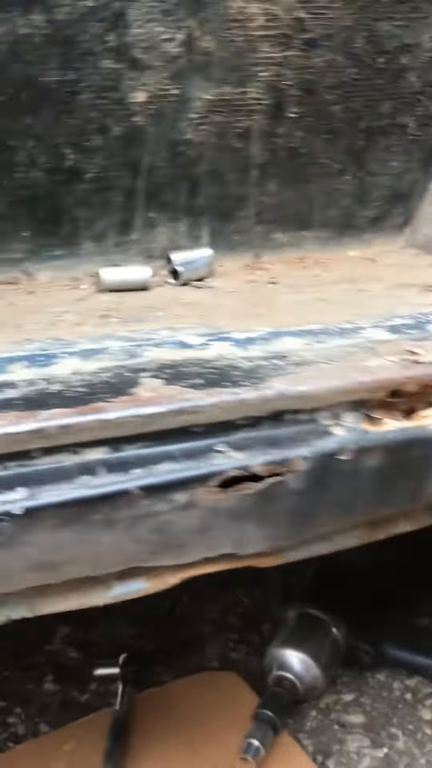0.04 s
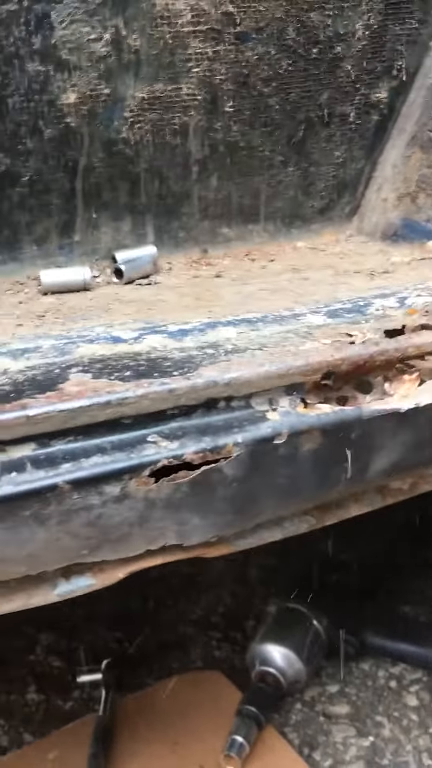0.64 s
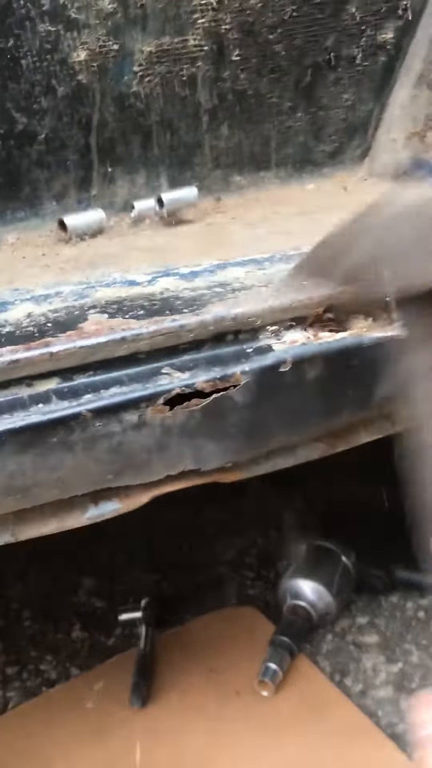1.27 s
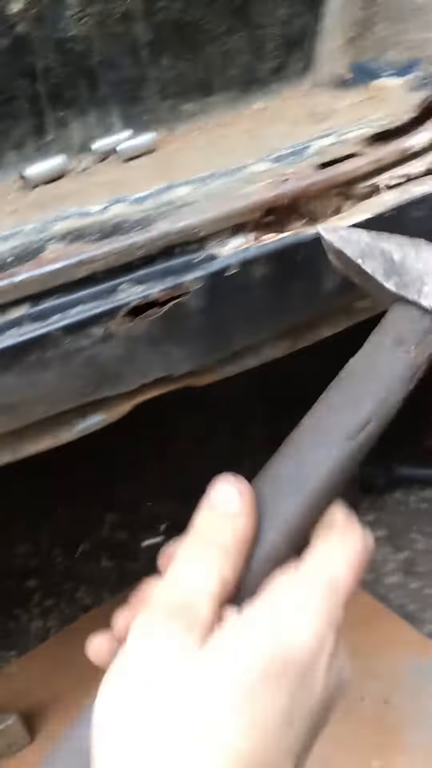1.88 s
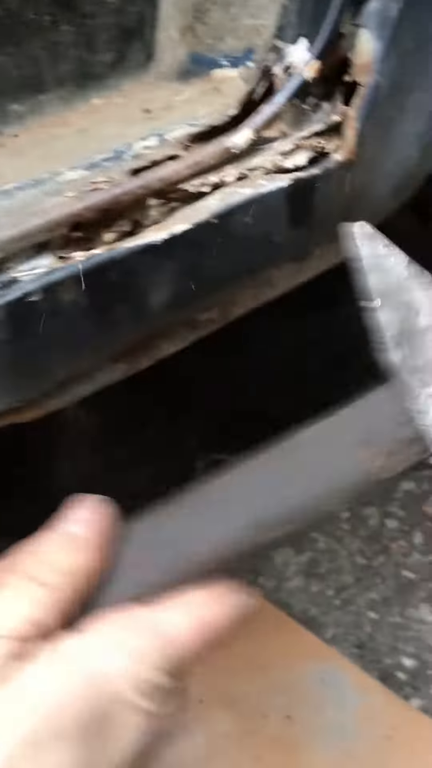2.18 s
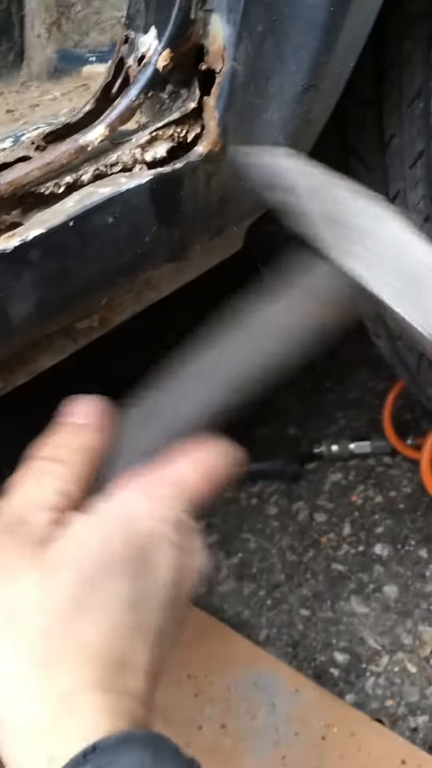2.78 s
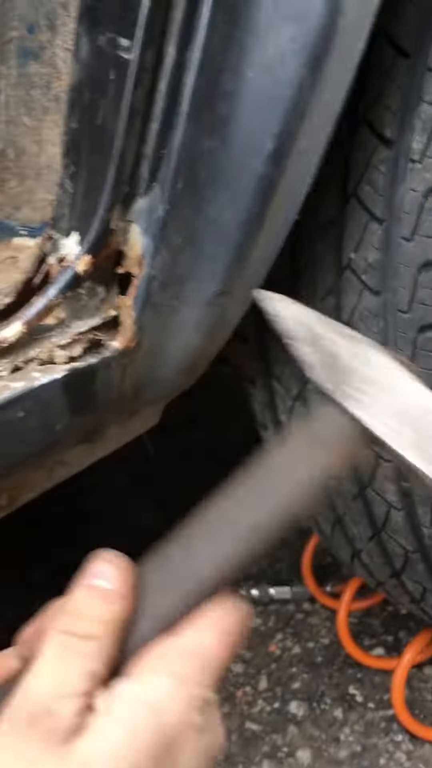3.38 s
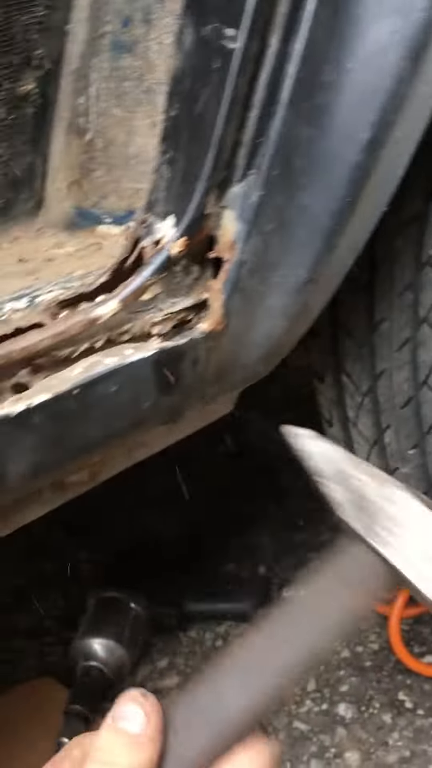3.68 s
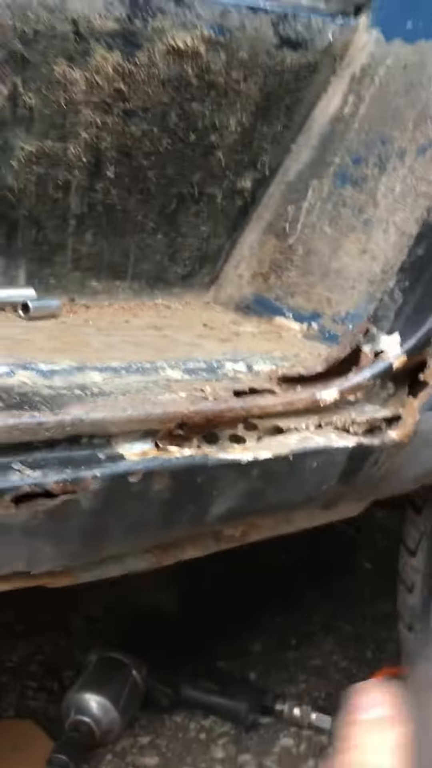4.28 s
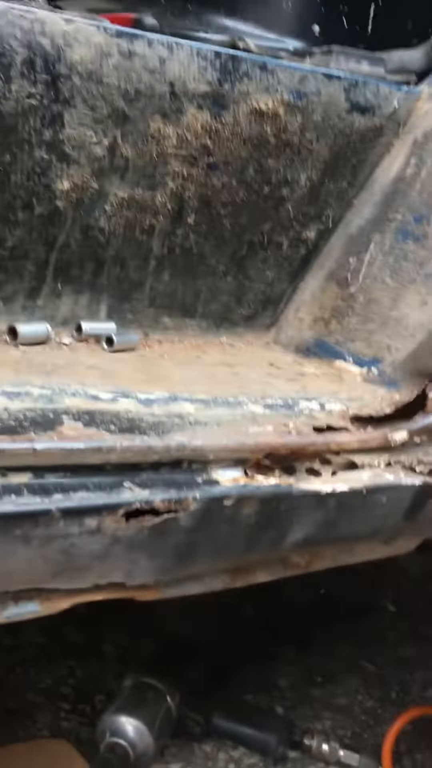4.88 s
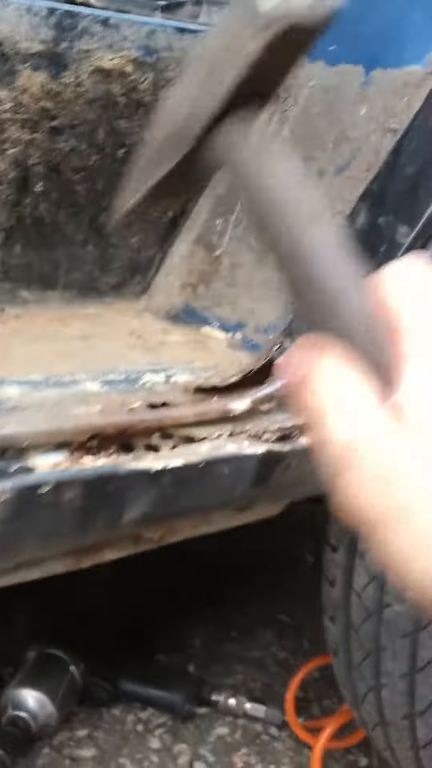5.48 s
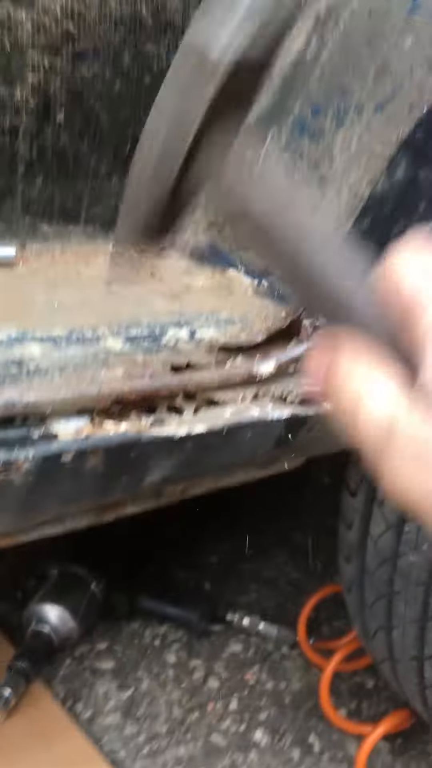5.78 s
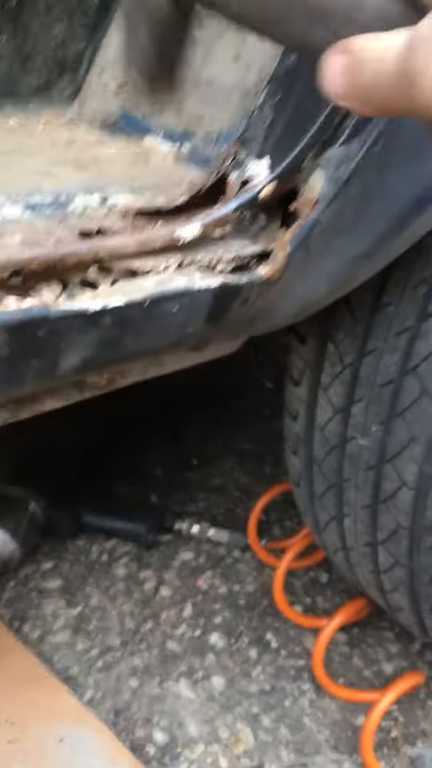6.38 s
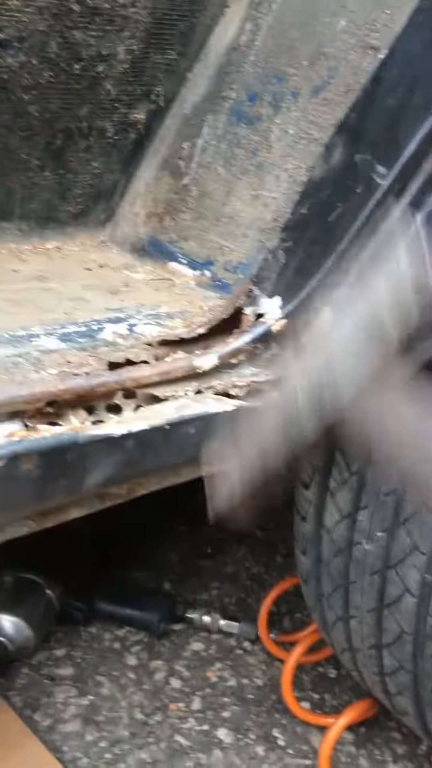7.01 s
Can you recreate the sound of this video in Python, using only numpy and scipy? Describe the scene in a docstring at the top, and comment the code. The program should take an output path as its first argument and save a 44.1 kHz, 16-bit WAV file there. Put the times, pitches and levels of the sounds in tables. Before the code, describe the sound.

A hammer strikes the rusted steel sill of a car, close up, from the very start, at about four blows a second. Each hit combines a crunch of breaking rust, a short clang of thin sheet and a low boom from the hollow body. Sharp ticks of landing flakes or light hammer touches fall between the blows, and fine grit trickles down. Jolted steel sockets clink very faintly around 2.5 to 3.3 seconds. The pace loosens slightly after 3.6 seconds, with a cluster of ticks around 4.3 and a harsh, tearing hit at 4.5. After a half-second gap, two deeper, boomier blows land on the floor pan at 5.1 and 5.3 seconds. Steady hammering continues until about 6.7, with another tearing hit at 6.5, and a little debris falls near 7 seconds. A distant machine hums faintly throughout, and the workshop walls add a short, slight echo.

```python
"""In a workshop, a hammer knocks rotten steel out of a car's sill, close up, blow after blow.
Each hit layers a crunch of breaking rust, a clang of thin sheet, a ring of low panel modes and the boom
of the hollow body. Sharp ticks follow as flakes land or the hammer touches or scrapes the steel again.
Grit trickles down and jolted steel sockets clink faintly. A far machine hums underneath,
the walls add a faint tail and a fast limiter flattens the hits."""
import sys
import numpy as np
from scipy import signal
from scipy.fft import rfft, irfft
from scipy.io import wavfile
from scipy.ndimage import uniform_filter1d, minimum_filter1d

SR = 44100
rng = np.random.default_rng(int(sys.argv[2]) if len(sys.argv) > 2 else 0)


def master_out(mix):
    """Clip the mix to full scale and print it as 16-bit PCM to the path in sys.argv[1]."""
    frames = np.transpose(np.atleast_2d(mix))
    ceiling = np.clip(frames, -1, 1)
    pcm = np.round(ceiling * 32767).astype(np.int16)
    wavfile.write(sys.argv[1], SR, pcm)


N = 319725
TIME = np.arange(N) / SR
T = np.arange(24000) / SR  # time axis of a one-shot
HZ = np.fft.rfftfreq(len(T), 1 / SR)

# Levels in the tables are relative; each layer sets its own gain.
# fader ride of the far machine: t/s, level/dB
MACHINE_RIDE = [(0.0, -38.5), (0.6, -40), (1.07, -36.5), (1.82, -45.5), (2.06, -36), (5.59, -36),
                (7.25, -45.5)]
# its shaft harmonics: multiple of the shaft rate, level/dB
SHAFT_ORDERS = [(2, -19), (3, -2.5), (4, 2.5), (5, 4.5), (6, 6.5), (7, -0.5), (8, 2.5), (9, -11.5),
                (11, -18.5), (13, -23), (15, -15)]
# spectrum of its rumble: f/Hz, level/dB
RUMBLE_EQ = [(22, -37), (45, -3), (110, -1), (195, 0), (260, -14), (600, -33), (950, -29), (3000, -43.5),
             (16000, -64.5)]
# spectrum of the still air: f/Hz, level/dB
AIR_EQ = [(100, -16.5), (1000, -16.5), (16000, -10.5)]
# decay of the workshop: f/Hz, t60/s (decays() floors it at 15 ms)
ROOM_DECAY = [(150, -1), (500, 0.37), (1500, -0.01), (5000, 0.21), (14000, 0.1)]
# tone of its tail: f/Hz, level/dB
ROOM_EQ = [(150, -4.5), (600, -6), (2000, 2.0), (14000, -8)]
# sockets clinking: t/s, level/dB
SOCKET_CUES = [(2.467, -64.5), (2.679, -53.5), (3.317, -56.5)]
# patches of rust giving way and sliding down: t/s, level/dB
SPILL_CUES = [(0.53, -60), (1.551, -56), (2.08, -51), (2.6, -54.5), (3.86, -72), (4.22, -58), (6.299, -57),
              (7.029, -57.5)]
# tone of falling grit: f/Hz, level/dB
GRIT_EQ = [(300, -18), (1000, 3), (3200, 6), (5000, -1.5), (6500, 2.5), (8000, -1.5), (12000, 3),
           (16000, -5.5)]
# sharp ticks of rust flakes landing, and of the hammer touching or scraping again: t/s, level/dB
TICK_CUES = [(0.2027, -41.5), (0.6147, -33.5), (0.6299, -42), (0.662, -43.5), (0.7322, -45), (1.2175, -42),
             (1.226, -42), (1.404, -44.5), (1.6162, -45.5), (1.659, -46.5), (1.7042, -42), (2.1964, -34.5),
             (2.3565, -39.5), (2.5821, -39), (2.898, -42.5), (3.0056, -45), (3.9061, -40.5), (4.222, -36),
             (4.3086, -29), (4.3305, -44.5), (4.4062, -39.5), (4.4473, -41.5), (4.5016, -40.5),
             (4.5718, -31), (5.383, -47), (5.6773, -50.5), (6.1373, -39), (6.4968, -44), (7.071, -49.5)]
# decay of a tick's rattle: f/Hz, t60/s
TICK_DECAY = [(500, .1), (1500, 0.074), (4000, 0.036), (12000, 0.1)]
# wall slaps of the boom: delay/s, level/dB
WALL_SLAPS = [(0.0385, -13.5), (0.059, -23.5), (.071, -25.5)]
# slow modes of the whole body shell: f/Hz, level/dB, t60/s
SHELL_MODES = [(50.7, -24.5, 0.34), (75.2, -22, 0.45), (101.2, -15, 0.26), (122.9, -27.5, 0.59),
               (204, -24, 0.33)]
# modes of the sill and floor pan: f/Hz, level/dB, t60/s
PANEL_MODES = [(216.5, 3, 0.21), (262.6, -1, 0.27), (317.3, 4.5, 0.13), (372, 0.5, 0.24),
               (417.3, 2.5, 0.14), (438.8, 6.5, 0.14), (521, -11, 0.17), (576.7, -3, 0.12),
               (650, -14, 0.19), (727, -5.5, 0.081), (812, 0, .09), (1031, -6, 0.049)]
# tone of the crowd of higher sheet modes: f/Hz, level/dB
SHEET_EQ = [(60, -24), (200, -3.5), (400, -5.5), (1000, -3), (1500, -6), (2300, -7.5), (3500, -5),
            (5000, -12), (6300, -8), (7400, -14), (9200, -10), (10400, -14), (15500, -18), (17000, -40.5)]
# their decay: f/Hz, t60/s
SHEET_DECAY = [(200, 0.28), (900, 0.14), (2500, 0.11), (6000, 0.068), (14000, 0.035)]
# bright tilt of breaking rust: f/Hz, level/dB
CRUNCH_EQ = [(300, -12), (1000, 0), (4000, 2.5), (9000, 5)]
# layer balance for each part of the car: boom/dB, ring/dB, clang/dB, crack/dB, fizz/dB, grit/dB
PART_MIX = {"sill": (-11, -18, -18, -21, -25, -61.5), "floor": (-7, -25, -22.5, -30.5, -28.5, -72.5),
            "corner": (-11.5, -15, -19, -26, -28, -72.5)}
# hammer hits: t/s, part of the car, force/dB, tear/0-1, rust at the spot/dB, clang f/Hz
HIT_CUES = [(-0.07, "sill", -0.5, 0.43, -9, 900), (0.2235, "sill", 1, 0.95, 0.5, 575),
            (0.5154, "sill", -3, 0.23, 4.5, 920), (0.805, "sill", -0.5, 0, -2, 920),
            (1.081, "sill", -.2, 0.05, -3.5, 1060), (1.3121, "sill", 1, 0.07, -4.5, 1088),
            (1.854, "sill", 1.2, 0.28, -2, 790), (2.0668, "sill", 0.6, 0.41, 1, 920),
            (2.2744, "sill", 1.2, 0.18, 1, 1164), (2.4672, "sill", 0, 0.18, 0.5, 1070),
            (2.6532, "sill", -2.5, 0.02, 3, 875), (2.844, "sill", -3, 0.2, -3, 890),
            (3.0822, "sill", -1.1, 0.31, 3.5, 1001), (3.317, "sill", 0.1, 0.2, 1, 1018),
            (3.5582, "sill", -0.5, 0.3, 1.5, 846), (3.9287, "sill", 1, 0.34, -2, 875),
            (4.1852, "sill", 0.1, 0.19, -3, 1052), (4.5421, "sill", -3, 0.9, 5.5, 1018),
            (5.085, "floor", 0, 0.13, 6, 818), (5.3391, "floor", 3.5, 0.35, -5, 890),
            (5.585, "corner", 0.9, 0, 1, 1088), (5.8502, "corner", -1, .05, 3.5, 832),
            (6.0895, "corner", 1, .2, 0.5, 860), (6.2994, "corner", -2, 0.28, -6, 730),
            (6.5053, "corner", -5, 0.77, 7, 791), (6.7322, "corner", -2.5, 0, -4.5, 752)]


def gain_of(db):
    """Decibels to amplitude."""
    return 10 ** (np.asarray(db) / 20)


def unit_rms(x):
    """Scales a bed to rms 1."""
    return x / np.sqrt(np.mean(x ** 2) + 1e-20)


def unit_hit(x):
    """Scales a one-shot to the energy of 30 ms at rms 1."""
    return x / np.sqrt(np.sum(x ** 2) / (.03 * SR) + 1e-20)


def curve(points, hz=HZ):
    """Reads breakpoints on a log-frequency axis."""
    f, value = np.transpose(points)
    return np.interp(np.log(hz + 1), np.log(f + 1), value)


def add(mix, s, sound):
    """Mixes a sound in at s seconds, trimming any overhang."""
    start = round(s * SR)
    sound = sound[max(-start, 0):]
    part = mix[max(start, 0):][:len(sound)]
    part += sound[:len(part)]


def eq(x, db):
    """Minimum-phase EQ with the gain db on the grid HZ."""
    log_gain = np.log(gain_of(np.maximum(db, -100)))
    mirrored = np.concatenate([log_gain, log_gain[-2:0:-1]])
    response = np.exp(np.conj(signal.hilbert(mirrored)))
    taps = np.fft.ifft(response).real[:2048]
    return signal.oaconvolve(x, taps)[:len(x)]


def decays(t60, count=8):
    """Overlapping bands and the envelope with which each dies."""
    centres = np.geomspace(150, 14000, count)
    bands = np.array([np.interp(np.log(HZ + 1), np.log(centres), row) for row in np.eye(count)])
    seconds = np.clip(curve(t60, centres), .015, .7)
    return bands, np.exp(-np.log(1000) * T / seconds[:, None])


def dense_ring(bands, envelopes):
    """Noise as countless modes, each band dying at its own speed."""
    return (irfft(bands * rfft(rng.standard_normal(len(T)))) * envelopes).sum(0)


def modes(table, gains_db, detune=0.0027):
    """Damped sines, slightly retuned at every strike."""
    hz, db, t60 = np.transpose(table)[:, :, None]
    shift, phase = rng.standard_normal((2, len(table), 1))
    waves = np.sin(2 * np.pi * (hz * (1 + detune * shift) * T + phase))
    return (gain_of(db + gains_db[:, None]) * waves * np.exp(-np.log(1000) * T / t60)).sum(0)


def bell(centre_hz, octaves):
    """A resonance as an EQ bell of height 1 on the grid HZ."""
    return 1 / (1 + (np.log2((HZ + 1) / centre_hz) / octaves) ** 2)


def noise_bed(spectrum):
    """Steady noise with the given spectrum."""
    shape = gain_of(curve(spectrum, np.fft.rfftfreq(N, 1 / SR)))
    return unit_rms(irfft(rfft(rng.standard_normal(N)) * shape, N))


def machine(shaft_hz=23.83, waver=.006, hum_db=-5, rumble_db=-4, air_db=-74):
    """The bed: harmonics of a slightly wavering shaft over a low rumble and still air."""
    drift = np.interp(TIME, np.linspace(0, TIME[-1], 30), rng.standard_normal(30))
    turns = np.cumsum(shaft_hz * (1 + waver * drift)) / SR
    hum = sum(gain_of(db) * np.sin(2 * np.pi * (k * turns + rng.random())) for k, db in SHAFT_ORDERS)
    running = gain_of(hum_db) * unit_rms(hum) + gain_of(rumble_db) * noise_bed(RUMBLE_EQ)
    fader = gain_of(np.interp(TIME, *np.transpose(MACHINE_RIDE)))
    return fader * running + gain_of(air_db) * noise_bed(AIR_EQ)


def workshop(x, wet_db=-23, build_s=0.022):
    """Reverb return: a faint, short tail from the walls."""
    tail = dense_ring(*decays(ROOM_DECAY)) * (1 - np.exp(-T / build_s))
    tail = eq(tail / np.linalg.norm(tail), curve(ROOM_EQ))
    return gain_of(wet_db) * signal.oaconvolve(x, tail)[:N]


def sockets(hz=11250, t60=0.43):
    """Jolted sockets ring with one thin high note."""
    out = np.zeros(N)
    for s, db in SOCKET_CUES:
        add(out, s, gain_of(db) * np.sin(2 * np.pi * hz * T) * np.exp(-np.log(1000) * T / t60))
    return out


def patter(per_s, count=5, grain_s=.0018):
    """Crumbs of rust land as noise grains, mostly tiny; each class of crumb has its own pitch."""
    out = np.zeros(N)
    for crumb_hz in np.geomspace(1700, 10000, count):
        lands = rng.random(N) < per_s / count / SR
        strength = gain_of(5.5 * np.minimum(rng.exponential(1, N), 3))
        power = signal.lfilter([1], [1, -np.exp(-1 / (grain_s * SR))], (lands * strength) ** 2)
        grains = np.sqrt(power + 1e-12) * rng.standard_normal(N)
        out += eq(grains, curve(GRIT_EQ) + 10 * bell(crumb_hz, .25))
    return unit_rms(out)


def grit(shower_db=2.5, fall_s=0.19, stray_db=-75, tear_db=-9):
    """Each hit or spill sheds a shower that swells and fades; stray crumbs drop in between."""
    shower = np.zeros(N)
    u = T / fall_s
    shaken = [(s, PART_MIX[part][-1] + rust_db + tear * tear_db)  # a tearing hit shakes less loose
              for s, part, _, tear, rust_db, _ in HIT_CUES]
    for s, db in [*shaken, *SPILL_CUES]:
        add(shower, s, gain_of(db + shower_db) * u * np.exp((1 - u ** 2) / 2))
    return shower * patter(per_s=130) + gain_of(stray_db) * patter(per_s=14)


def ticks(middling_db=-39.5, middling_hz=2127, chink_db=-5, spill_s=.15, hop_s=.025, hop_db=-15.5):
    """A flake lands, or the hammer touches or scrapes again: snap, dry rattle, chink and one bounce."""
    out = np.zeros(N)
    bands, envelopes = decays(TICK_DECAY)
    small_flakes = [(s + spill_s * rng.uniform(.2, 1), db + 1.5 - .5 * rng.standard_normal())
                    for s, db in SPILL_CUES for _ in range(2)]
    for s, db in [*TICK_CUES, *small_flakes]:
        accent_db = db - middling_db  # louder ticks ring slightly higher, with less top end
        centre_hz = middling_hz * 2 ** (.02 * accent_db)
        top_db = -7.5 - accent_db
        tone = curve([(150, -20), (500, -6), (1100, 6.5), (4500, -1),
                      (9000, 4 + top_db), (16000, -6 + top_db)])
        snap = unit_hit(rng.standard_normal(len(T)) * np.exp(-T / 0.00034))
        rattle = unit_hit(dense_ring(bands, envelopes))
        click = unit_hit(eq(snap + rattle, tone + 9 * bell(centre_hz, octaves=1)))
        own_modes = [(centre_hz * 2 ** step, 0, .035) for step in rng.uniform(-.8, .8, 5)]
        chink = gain_of(chink_db) * unit_hit(modes(own_modes, np.zeros(5)))
        tick = gain_of(db + 1) * unit_hit(click + chink)
        add(out, s, tick)
        add(out, s + hop_s * rng.uniform(0.26, 1), gain_of(hop_db) * tick)
    return out


def boom(hz=163, swell_s=.015, sag=0.11, sag_s=0.011, steepness=4.6, scatter=.025):
    """Low end: the hollow body swells and sags in pitch; the walls slap back and the shell sways on."""
    pitch = hz * (1 + scatter * rng.standard_normal()) * (1 + sag * np.exp(-T / sag_s))
    u = T / swell_s
    direct = -np.cos(2 * np.pi * np.cumsum(pitch) / SR) * (u * np.exp(1 - u)) ** steepness
    out = direct.copy()
    for delay, db in WALL_SLAPS:
        add(out, delay + 0.0009 * rng.standard_normal(), gain_of(db) * direct)
    shell = modes(SHELL_MODES, 2 * rng.standard_normal(len(SHELL_MODES))) * (1 - np.exp(-u))
    return unit_hit(out + shell)


def panel(clang_hz, spread_db=2, favour_db=9, rise_s=0.0048):
    """Low mids: the modes of the steel; the struck spot favours those near its own pitch."""
    nearness = np.interp(np.transpose(PANEL_MODES)[0], HZ, bell(clang_hz, 0.15))
    gains_db = favour_db * nearness + spread_db * rng.standard_normal(len(PANEL_MODES))
    return unit_hit(modes(PANEL_MODES, gains_db, detune=.014) * (1 - np.exp(-T / rise_s)))


def crunch(tear, held_s=.004, torn_s=.013, per_s=2200, contact_s=.001, late_db=-9.5):
    """Attack: the contact, a run of rust fractures that lasts longer as steel tears, three late snaps."""
    decay_s = held_s + tear * (torn_s - held_s)
    fractures = rng.standard_normal(len(T)) * (rng.random(len(T)) < per_s / SR) * np.exp(-T / decay_s)
    contact = unit_hit(rng.standard_normal(len(T)) * np.exp(-T / contact_s))
    out = unit_hit(fractures) + contact
    for delay in rng.uniform(.005, .045, 3):
        add(out, delay, gain_of(late_db) * np.exp(1 - delay / .014) * contact)
    return unit_hit(out)


def spot_resonances(clang_hz, focus_db=8, octaves=.32, ripple_db=4, count=110):
    """EQ curve of the struck spot in dB: one broad resonance and many random narrow ones."""
    broad = focus_db * (bell(clang_hz, octaves) - bell(clang_hz, 2 * octaves) / 2)
    ripple = ripple_db * rng.uniform(-0.78, 1, count)
    return broad + np.interp(HZ, np.geomspace(500, 16000, count), ripple, left=0)


def hammer(sheet_db=10.5, usual_clang_hz=930):
    """Each hit drives body, panel and thin sheet; part, force, tearing and rust set the balance."""
    out = np.zeros(N)
    bands, envelopes = decays(SHEET_DECAY)
    for s, part, force_db, tear, rust_db, clang_hz in HIT_CUES:
        boom_db, ring_db, clang_db, crack_db, fizz_db, _ = PART_MIX[part]
        # tearing steel takes the push from the body and clangs instead
        boom_db += force_db - 8.5 * tear
        ring_db += force_db - 3 * tear
        clang_db += force_db + 9 * tear
        # a wide loose spot clangs lower and sets more of the panel ringing
        ring_db -= 5.5 * np.log2(clang_hz / usual_clang_hz)
        # a harder hit breaks more rust
        crack_db += 1.2 * force_db + .4 * rust_db
        fizz_db += 1.2 * force_db + rust_db
        balance = curve([(450, ring_db), (1000, clang_db), (2800, crack_db), (8500, fizz_db)])
        tone = balance + curve(SHEET_EQ) + spot_resonances(clang_hz)
        breaking = eq(crunch(tear), curve(CRUNCH_EQ))
        clang = gain_of(-1) * unit_hit(dense_ring(bands, envelopes))
        add(out, s, gain_of(sheet_db) * eq(breaking + clang, tone))
        add(out, s, gain_of(ring_db - 1) * panel(clang_hz))
        add(out, s, gain_of(boom_db + .4) * boom())
    return out


def scene():
    """Mono mix: the close sources and their reverb over the machine bed."""
    close = hammer() + ticks() + grit() + sockets()
    return (close + workshop(close) + machine())[None]


def record(dry, ceiling=.72, cutoff_hz=16100):
    """Master chain: a fast limiter holds the peaks down, then a steep low-pass trims the top."""
    allowed = np.minimum(1, ceiling / (abs(dry[0]) + 1e-9))
    limited = dry * uniform_filter1d(minimum_filter1d(allowed, size=31), size=31)
    lowpass = signal.firwin(255, cutoff_hz, window=("kaiser", 9), fs=SR)
    return signal.oaconvolve(limited, lowpass[None], "same", axes=1)


dry = scene()
out = record(dry)
master_out(out)
```